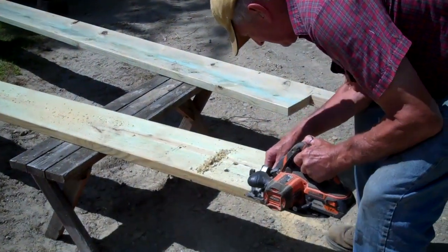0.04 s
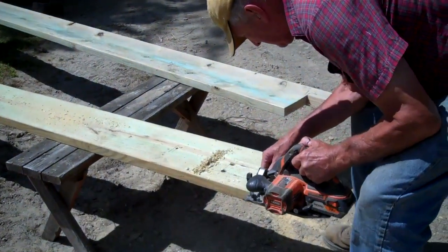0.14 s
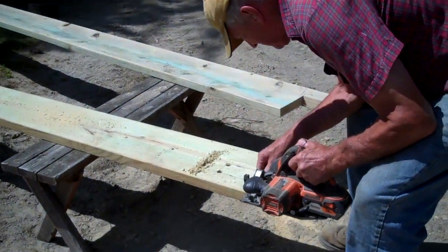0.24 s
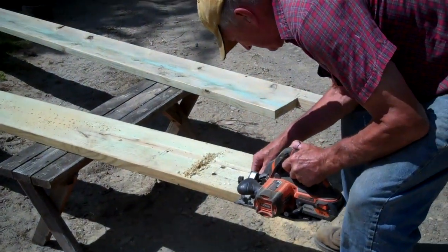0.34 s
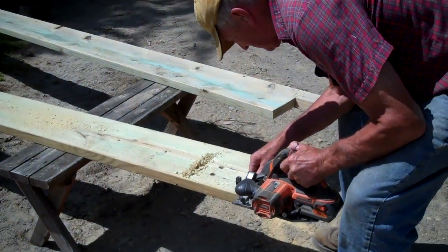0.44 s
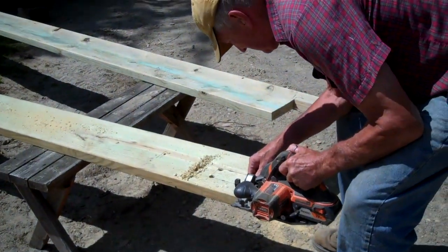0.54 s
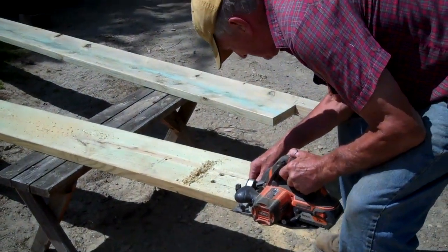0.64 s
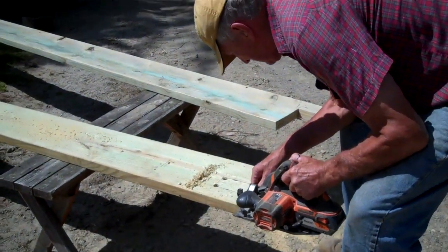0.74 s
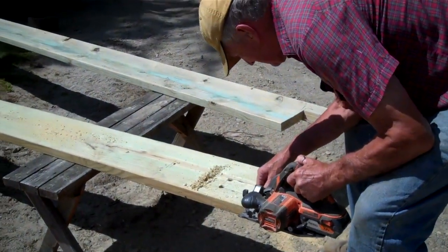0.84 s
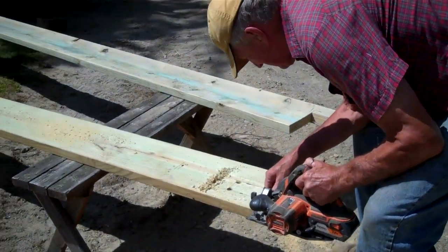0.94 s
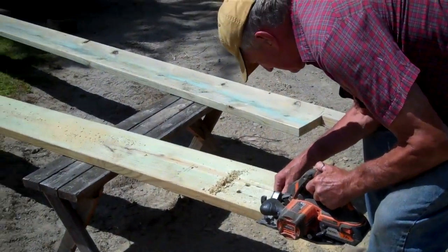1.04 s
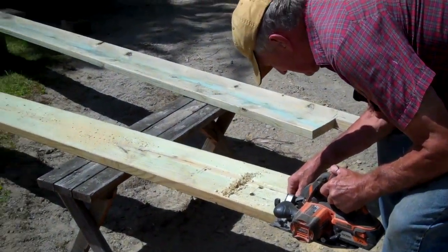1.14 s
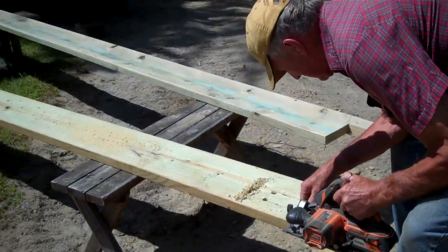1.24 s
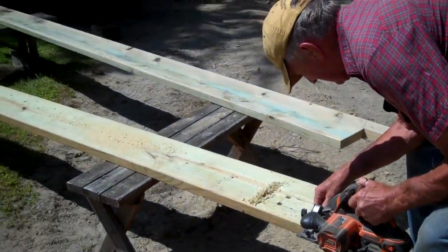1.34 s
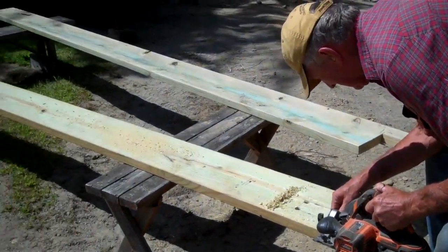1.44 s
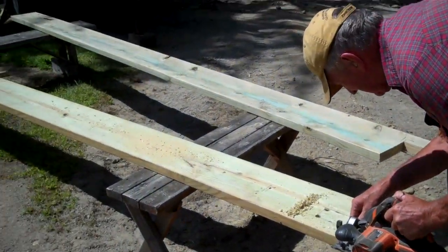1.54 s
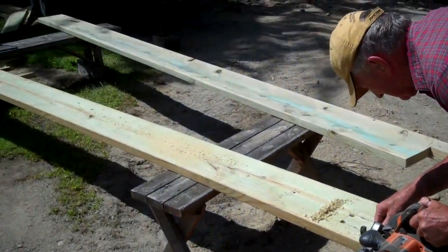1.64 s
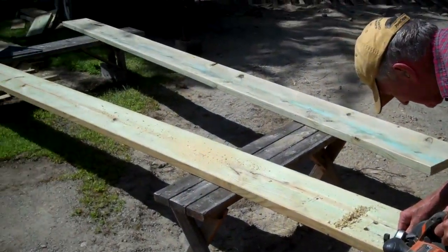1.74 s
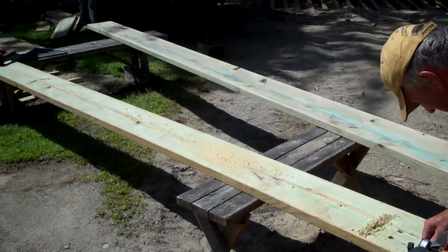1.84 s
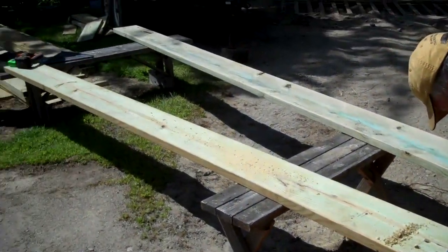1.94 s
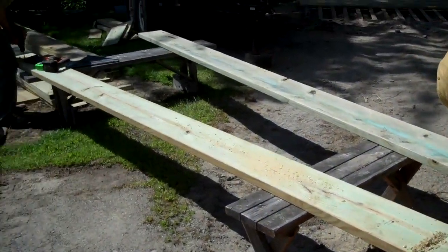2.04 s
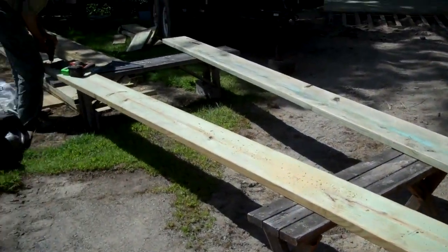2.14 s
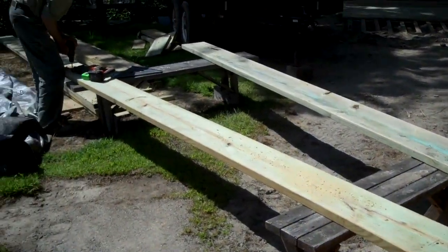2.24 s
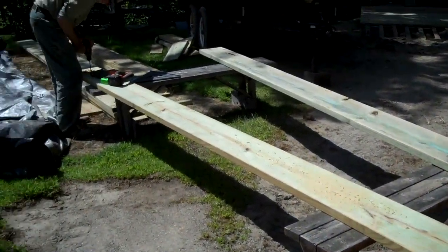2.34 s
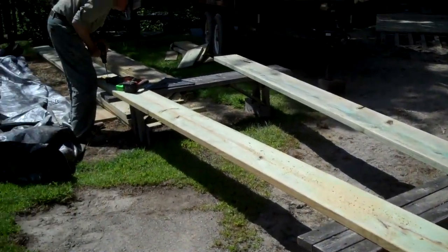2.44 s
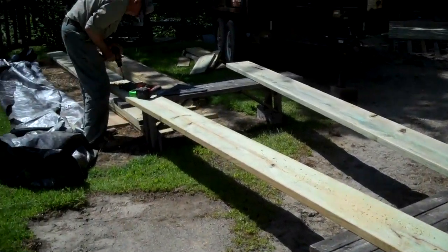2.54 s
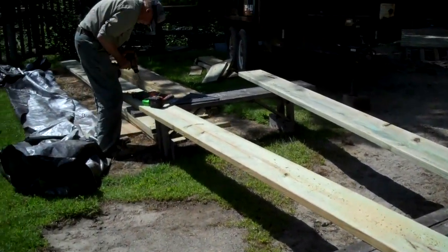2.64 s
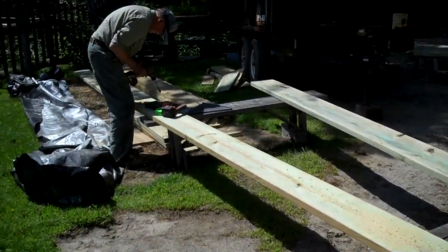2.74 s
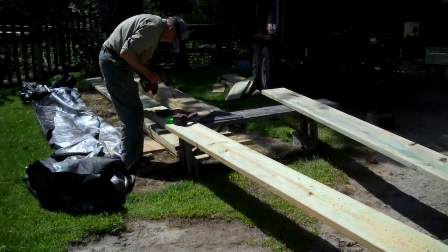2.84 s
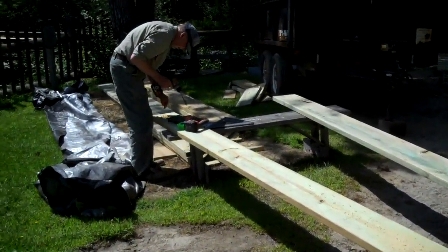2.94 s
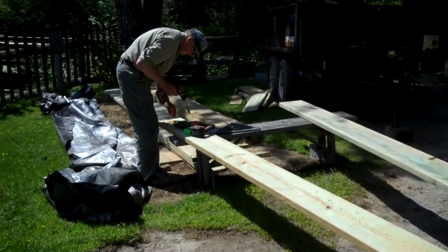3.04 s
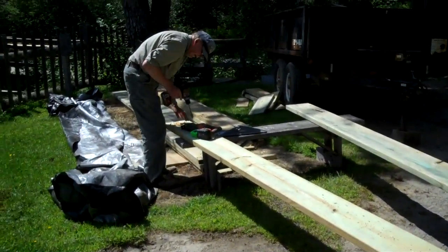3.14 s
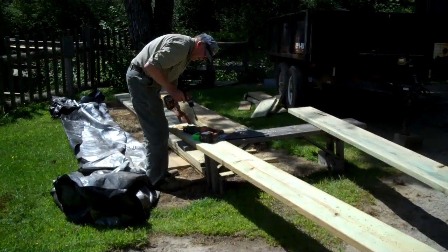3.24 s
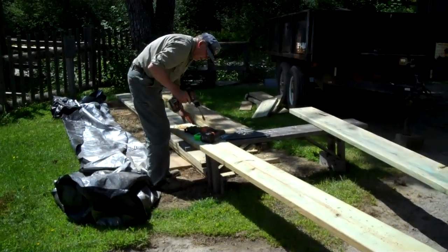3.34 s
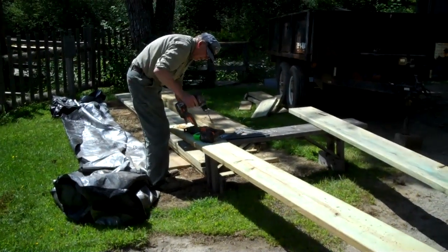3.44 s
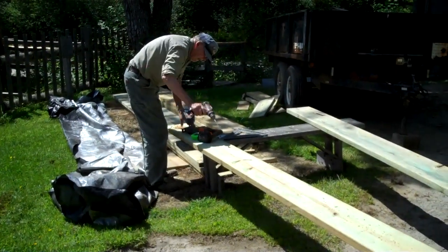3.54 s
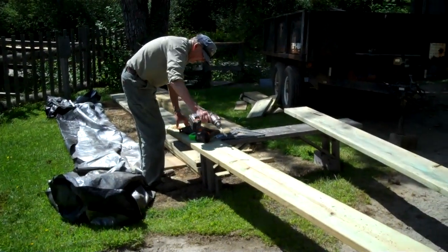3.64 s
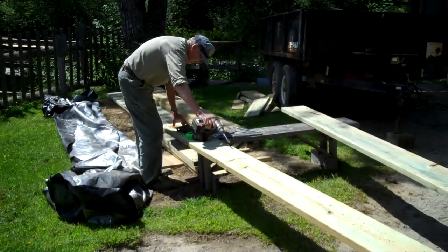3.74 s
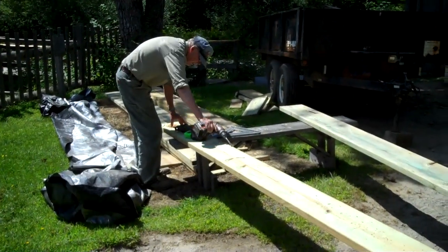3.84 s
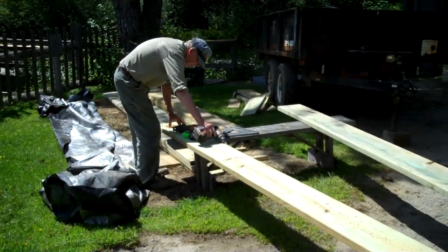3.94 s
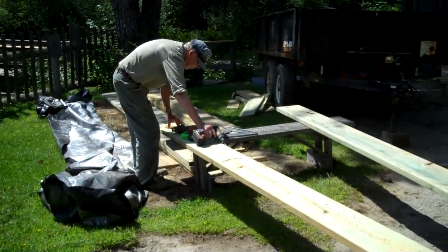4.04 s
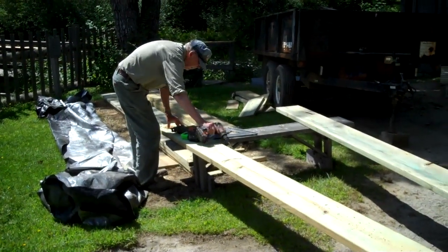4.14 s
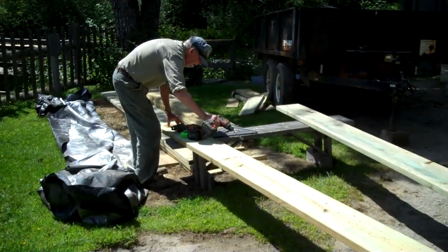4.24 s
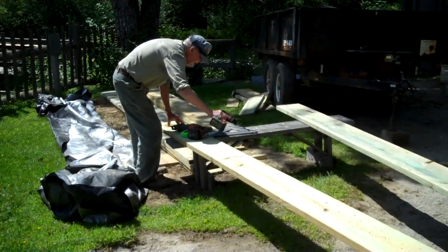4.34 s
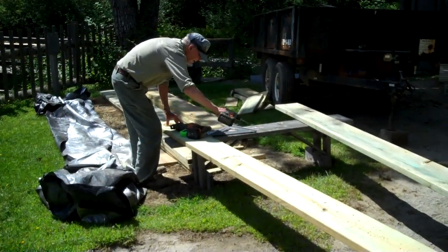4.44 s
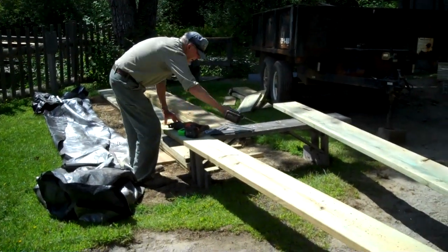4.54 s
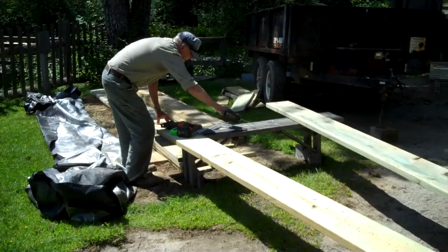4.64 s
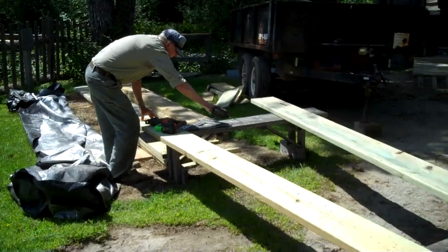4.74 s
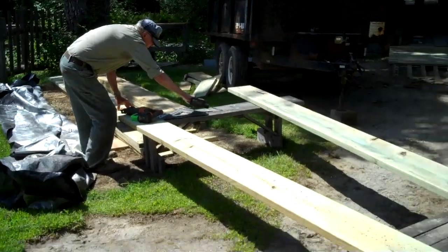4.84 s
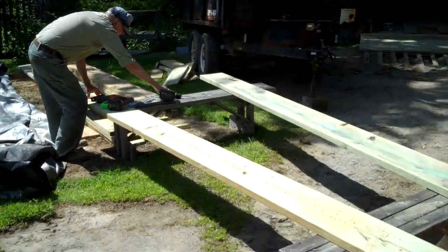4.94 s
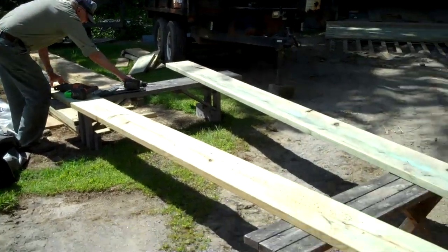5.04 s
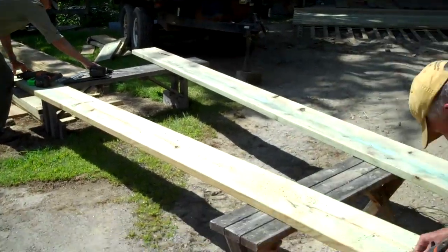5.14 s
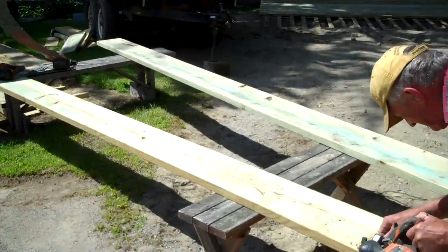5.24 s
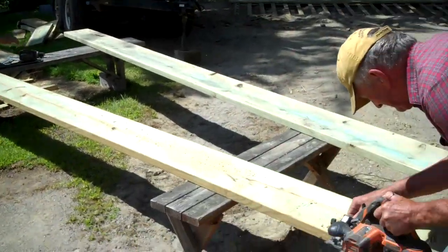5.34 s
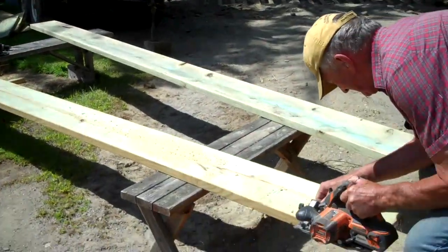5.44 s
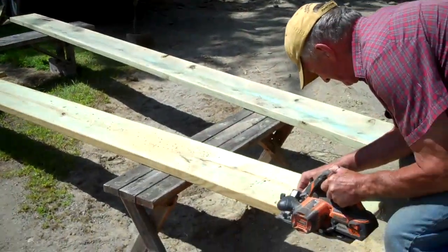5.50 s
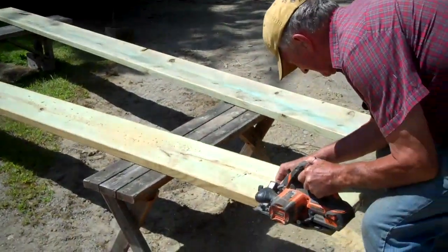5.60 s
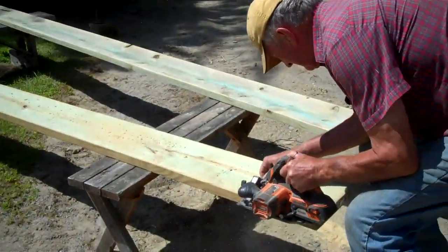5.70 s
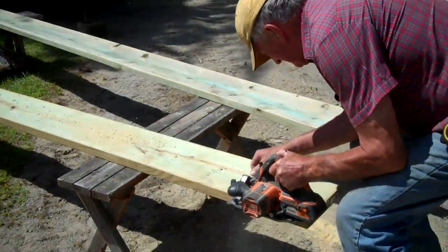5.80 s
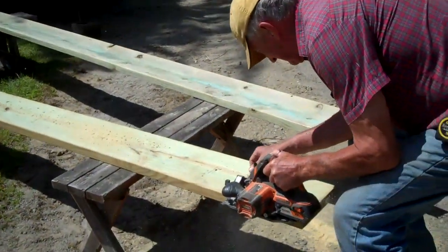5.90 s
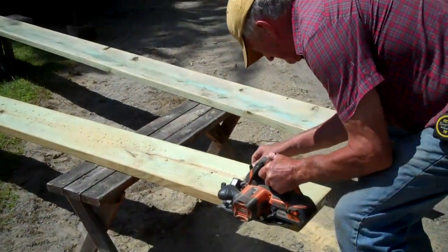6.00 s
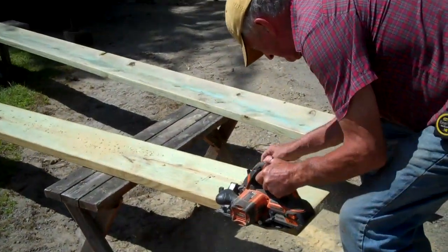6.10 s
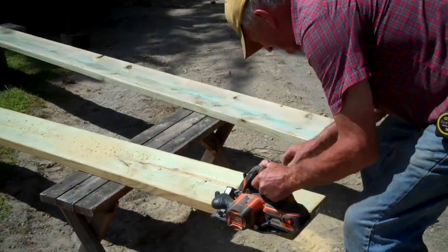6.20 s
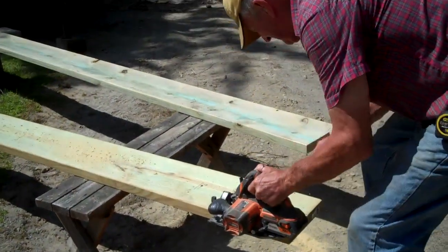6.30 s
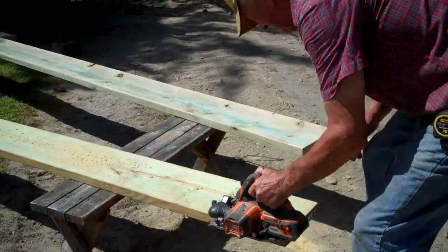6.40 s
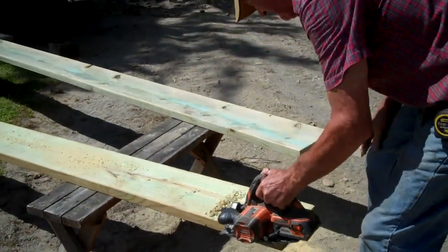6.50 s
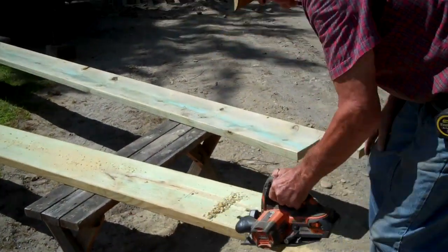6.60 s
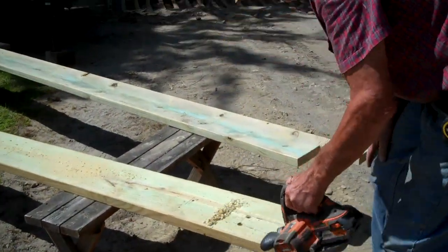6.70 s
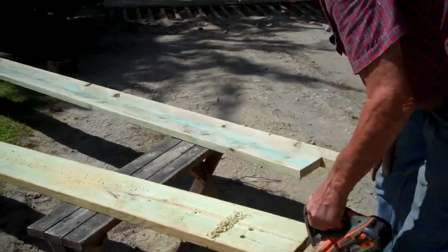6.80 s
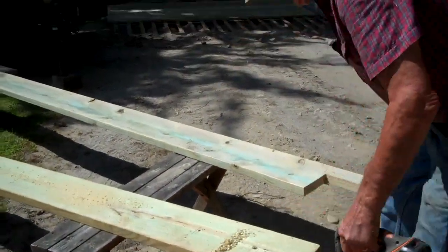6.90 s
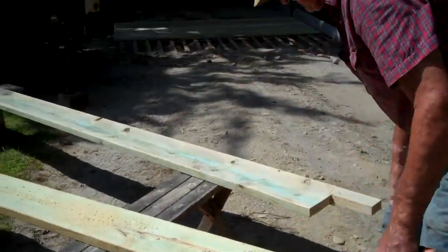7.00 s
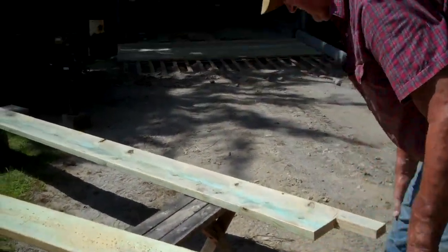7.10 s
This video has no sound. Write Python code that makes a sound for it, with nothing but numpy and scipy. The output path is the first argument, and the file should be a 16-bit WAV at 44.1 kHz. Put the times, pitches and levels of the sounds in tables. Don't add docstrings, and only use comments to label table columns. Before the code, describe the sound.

In an open yard, a second power tool whines and hisses farther off. At about one second a sharp switch click starts a planer very close by; it whirs up and cuts a plank with dense, bright hiss, flying chips and a low wooden hum. Its whine sinks under load, rises near the end, and the cutter brakes suddenly. Soft clatter follows as it is set down. A handheld stereo microphone swings, with the right side duller.

```python
import sys
import numpy as np
from scipy import signal
from scipy.io import wavfile
from scipy.ndimage import uniform_filter1d, map_coordinates

SR = 44100
rng = np.random.default_rng(int(sys.argv[2]) if len(sys.argv) > 2 else 0)


def master_out(mix):
    frames = np.transpose(np.atleast_2d(mix))
    ceiling = np.clip(frames, -1, 1)
    pcm = np.round(ceiling * 32767).astype(np.int16)
    wavfile.write(sys.argv[1], SR, pcm)


def attenuation_scalar(level_db):
    decades = np.asarray(level_db, float) / 20
    return 10 ** decades


N = 315756
TIME = np.arange(N) / SR
MESH, TURN = 0.552, 0.023
FREE_HZ = 2900
SWITCH_ON_S = 1.35


def rms_one(x):
    return x / np.sqrt(np.mean(x ** 2) + 1e-20)


def in_time(rows):
    s, *columns = np.transpose(rows)
    return [np.interp(TIME, s, c) for c in columns]


def at_hz(points, hz):
    points_hz, db = np.array(points).T
    return np.interp(np.log(hz), np.log(points_hz), db)


def between(start, stop, fade):
    return np.interp(TIME, [start - fade, start, stop, stop + fade], [0, 1, 1, 0])


def swells(rows):
    return sum(db * np.exp(-((TIME - s) / length) ** 2) for s, db, length in rows)


def drift(rate):
    r = np.exp(-80 * np.pi * rate / SR)
    white = rng.standard_normal(N // 40 + 2002)
    slow = signal.lfilter([1], [1, -2 * r, r * r], white)[2000:]
    slow = rms_one(slow - slow.mean())
    return np.interp(np.arange(N) / 40, np.arange(len(slow)), slow)


def resonance(x, hz, width):
    r = np.exp(-np.pi * width / SR)
    poles = [1, -2 * r * np.cos(2 * np.pi * hz / SR), r * r]
    return signal.lfilter([(1 - r * r) / 2, 0, (r * r - 1) / 2], poles, x)


def lifted(hz, modes):
    power = 1
    for f, width, db in modes:
        power = power + attenuation_scalar(db) ** 2 / (1 + (2 * (hz[::40] - f) / width) ** 2) ** 2
    return np.interp(np.arange(N), np.arange(N)[::40], 10 * np.log10(power))


def whine(hz, lines, wobble, waver_db):
    turn = 2 * np.pi * np.cumsum(hz) / SR
    out = np.zeros(N)
    for k, db in lines:
        level = np.sqrt(2) * attenuation_scalar(db + waver_db * drift(7.5))
        out += level * np.sin(k * turn + wobble * drift(160) + rng.uniform(0, 7.2))
    return out


# f/Hz, level/dB
SCATTERED = [(60, -14), (200, -10.5), (700, -23), (2200, -17.5), (5000, -6), (12000, -1.5)]


def hiss(colour, zones_hz, zones_db, shared_db, own_db, repeating=0):
    edges = 50 * 2 ** (np.arange(26) / 3)
    centres = np.sqrt(edges[1:] * edges[:-1])
    zone = np.searchsorted(zones_hz, centres)
    power = attenuation_scalar(at_hz(colour, centres)) ** 2 * np.diff(edges)
    white = rng.standard_normal((2, 3, N))
    white[:, 0] = rms_one(white[:, 0] + repeating)
    together = drift(3.2) + drift(45)
    out = np.zeros((3, N))
    for k, hz in enumerate(centres):
        band_filter = signal.butter(2, edges[k:k + 2], "band", fs=SR, output="sos")
        band = signal.sosfilt(band_filter, white[k % 2])
        zone_power = power[zone == max(zone[k], 1)].sum()
        share = np.sqrt(power[k] / zone_power * SR / 2 / (edges[k + 1] - edges[k]))
        gain = share * attenuation_scalar(zones_db[zone[k]] + shared_db * together + own_db * drift(7.4))
        out[0] += gain * band[0]
        out[1:] += gain * attenuation_scalar(at_hz(SCATTERED, hz)) * band[1:]
    return out


# t/s, f/Hz
NEAR_SPEED = [(1.7, 2837), (2.0, 2833), (2.3, 2958), (2.62, 3047), (3.05, 2830), (3.4, 2360), (3.55, 2216),
              (3.7, 2151), (3.9, 2241), (4.05, 2145), (4.35, 2184), (4.6, 2130), (5.0, 1916), (5.2, 1792),
              (5.58, 1751), (5.72, 1932), (5.9, 2056), (6.22, 2590)]


def speed():
    spin_up_s, settle_s = 0.118, 0.32
    since = np.clip(TIME - SWITCH_ON_S, 0, 1)
    return in_time(NEAR_SPEED)[0] * (1 - np.exp(-since / spin_up_s - (since / settle_s) ** 3))


# order, level/dB
COMMUTATOR_TONES = [(2, -56.5), (3, -58.5), (4, -59)]
# f/Hz, width/Hz, level/dB
HOUSING_MODES = [(3530, 450, 17), (3700, 200, 5), (4240, 300, 23), (4445, 77, 25.5), (4750, 180, 12),
                 (5170, 860, 31.5), (5550, 590, 23), (6380, 190, 7.5)]
# t/s, level/dB, length/s
LIGHT_LOAD = [
    (5.86, -11, .17),
    (1.37, -12, .03),
    (1.8, -8, .12),
]


def commutator():
    hz = speed()
    torque_db = 5 * between(1.43, 1.67, 0.03) + swells(LIGHT_LOAD)
    torque_db = torque_db + 10.5 * np.clip(FREE_HZ - hz, 0, 600) / 1000
    orders = []
    for k, db in COMMUTATOR_TONES:
        damped_db = np.clip((k * hz - 6450) / 40, 0, 14)
        orders.append((k, db + lifted(k * hz, HOUSING_MODES) + torque_db - damped_db))
    orders.append((2.86, -72 + torque_db + 28 * between(1.59, 1.5, 0.03)))
    throb = 1 + 0.3 * np.sin(2 * np.pi * np.cumsum(TURN * hz) / SR)
    unsteady = uniform_filter1d(np.abs(np.gradient(hz)) * SR / 2500, 2000)
    return throb * whine(hz, orders, wobble=0.25 + 0.65 * np.sqrt(np.abs(unsteady)), waver_db=2.0)


# multiple of the mesh rate, level/dB
MESH_TONES = [(1, -47.5), (2, -50), (3, -57.5), (1.5, -57), (4.5, -63.5)]
# multiple of the cutter turn, level/dB
SIDE_TONES = [(12, -17), (14, -15), (16, -16), (18, -20), (20, -15.5), (28, -12), (32, -14), (36, -8)]
# f/Hz, width/Hz, level/dB
GEARBOX_MODES = [(1059, 152, 15.7), (1217, 190, 13.5), (1450, 120, 12), (2520, 350, 14), (3440, 230, 25.6),
                 (4700, 120, 11), (7050, 160, 3.7)]


def gears():
    hz = speed()
    slack_db = 16 * between(0.74, 2.05, 0.11)
    mesh = []
    for k, db in MESH_TONES:
        mesh.append((k * MESH, db + lifted(k * MESH * hz, GEARBOX_MODES) + slack_db * (k not in (1, 2))))
    mesh_db = uniform_filter1d(mesh[0][1], 9000)
    sides = [(k * TURN, mesh_db + db + 0.5 * lifted(k * TURN * hz, GEARBOX_MODES)) for k, db in SIDE_TONES]
    return whine(hz, mesh, wobble=0.2, waver_db=2.0) + whine(hz, sides, wobble=0.3, waver_db=3.5)


# t/s, level/dB, length/s
PLANK_SWELLS = [
    (3.46, 9.5, 0.17),
    (4.0, 5, 0.16),
    (4.95, 3, 0.14),
]


def plank_hum():
    hz = speed()
    beats = whine(hz, [(k * TURN, 0) for k in range(3, 9)], wobble=0.1, waver_db=2.5)
    load_db = 2.5 * (FREE_HZ - hz) / 1000 * between(2.5, 4.99, 0.42)
    level_db = -51 + load_db + swells(PLANK_SWELLS)
    return attenuation_scalar(level_db) * resonance(beats, 259, 19.3) * between(1.62, 5.72, 0.24)


def near_motor():
    powered = between(1.4, 6.17, 0.03)
    return (commutator() + gears()) * powered + plank_hum()


# t/s, level/dB
PRESSURE = [(1.4, -22.5), (1.6, -18.5), (1.85, -20), (2.1, -19.5), (2.3, -21.5), (2.8, -19), (3.3, -19),
            (4.4, -19), (4.8, -18.5), (5.17, -17), (5.6, -20.5), (5.7, -20), (5.9, -20), (6.2, -23)]
# t/s, level/dB, length/s
BLADE_BITES = [
    (1.46, 2, 0.014),
    (1.74, 4.5, 0.04),
    (2.35, 3, 0.044),
    (2.61, 3.5, 0.083),
    (4.85, 1.5, .02),
    (5.77, 2.5, 0.057),
    (6.02, 5.5, 0.032),
    (6.17, 6, 0.038),
]


def cutting_db():
    brake_s, brake_db_per_s = 6.22, 112.5
    return in_time(PRESSURE)[0] + swells(BLADE_BITES) - brake_db_per_s * np.maximum(TIME - brake_s, 0)


def lost_khz():
    return np.minimum(FREE_HZ - speed(), 1200) / 1000


def running():
    return between(1.46, 7, 0.1) * between(0, 6.33, 0.04)


def each_turn():
    turns = np.cumsum(TURN * speed()) / SR + 0.0012 * drift(6)
    one_turn = rng.standard_normal(800)
    return rms_one(map_coordinates(one_turn, [turns % 1 * 800], order=3, mode="grid-wrap"))


# f/Hz, level/dB (per Hz)
CUTTING_COLOUR = [(88, -58), (150, -29), (256, -16), (375, -29), (592, -5), (744, -7), (972, -6),
                  (1200, -7.5), (1510, -6), (2770, 0.5), (3840, -1.5), (4300, -1.5), (5110, -5.5),
                  (6300, 1), (14300, -17)]


def cutting(near_lag):
    air_db, lost = cutting_db(), lost_khz()
    plank_db = air_db - 7.5 - 8 * lost
    housing_db = air_db - 1.5 - 2.5 * lost
    top_db = air_db - 13 + near_lag + 3.5 * between(3.23, 4.95, 0.2)
    under_db = np.minimum(uniform_filter1d(air_db, 20000), air_db + 4) - 13.0
    zones = [under_db, plank_db, housing_db, air_db, top_db]
    cut = hiss(CUTTING_COLOUR, [400, 1500, 4000, 8500], zones, shared_db=0.9, own_db=1.1,
               repeating=1.45 * each_turn())
    cut = running() * cut
    hollow = 0.1 + 0.5 * between(3.4, 4.8, 0.2)
    return cut - hollow * resonance(cut, 3410, 400)


# f/Hz, width/Hz, level/dB
CHIP_RINGS = [(6200, 220, 7), (2590, 450, -7), (7300, 2300, -17.5), (4700, 130, -72)]


def chips(near_lag):
    level_db = cutting_db() - 2 + 3 * lost_khz() - near_lag
    struck = rng.random(N) < 2500 * attenuation_scalar(4.5 * drift(50)) / SR
    force = attenuation_scalar(1.4 * np.minimum(rng.exponential(1, N), 4))
    clicks = struck * force * rng.choice([-1, 1], N) + 1e-18
    ringing = sum(attenuation_scalar(db) * resonance(clicks, hz, width) for hz, width, db in CHIP_RINGS)
    return running() * attenuation_scalar(level_db) * rms_one(ringing)


# t/s, peak level/dB, ring f/Hz, second ring f/Hz, length/s
KNOCK_EVENTS = [(1.3525, 5, 2290, 5440, 0.0066), (1.62, -7, 7500, 7050, 0.01),
                (2.657, -5, 6550, 3000, 0.01), (6.023, -15, 6200, 2800, 0.0034),
                (6.187, -9.5, 5914, 2476, 0.017), (6.276, -18.5, 2224, 1190, 0.016),
                (6.66, -21, 6300, 6000, 0.024), (6.7, -15.5, 6200, 6100, 0.034),
                (6.714, -21.5, 2560, 2300, 0.014), (6.73, -15, 2400, 3620, 0.0066),
                (6.745, -19, 2760, 5800, 0.022), (6.772, -18.5, 875, 1150, 0.038)]


def knocks():
    out, t = np.zeros(N + 3000), np.arange(3000) / SR
    for s, db, hz, second_hz, length in KNOCK_EVENTS:
        burst = rng.standard_normal(3000) * np.minimum(t / 0.0002, 1) * np.exp(-(t / length) ** 1.8)
        rings = resonance(burst, hz, 290) + 0.37 * resonance(burst, second_hz, 910)
        body = rings + attenuation_scalar(db / 2) * (0.019 * burst + 0.0022 * np.abs(burst))
        start = round(s * SR)
        out[start:start + 3000] += attenuation_scalar(db) * body / np.abs(body).max()
    return out[:N]


# t/s, f/Hz
FAR_MOTOR_SPEED = [(0.05, 1797), (.5, 2016), (.6, 1999), (.7, 1917), (.88, 1928), (.98, 1843), (1.12, 2119),
                   (1.29, 2072), (1.65, 1877), (1.8, 1919), (2.12, 1879), (2.4, 2048), (2.62, 2100),
                   (2.85, 2016), (3.0, 1980), (3.1, 1930), (3.27, 1840)]
# order, level/dB
FAR_TONES = [(1, -55), (2, -54), (3, -60), (4, -59), (5, -80)]
# f/Hz, width/Hz, level/dB
FAR_MODES = [(4000, 350, 16), (4150, 140, 21), (5800, 640, 27), (4750, 150, 15), (7400, 95, 22),
             (7570, 370, 19), (8050, 600, 11), (9600, 530, -1)]
# t/s, level/dB, length/s
FAR_HELD_BACK = [
    (1.02, -14, .06),
    (1.48, -10, .12),
]


def far_motor():
    hz, = in_time(FAR_MOTOR_SPEED)
    fan_db = 10 * between(1.622, 4, 0.03)
    orders = [(k, db + lifted(k * hz, FAR_MODES) + fan_db * (k == 4)) for k, db in FAR_TONES]
    level_db = swells(FAR_HELD_BACK) + 5 * between(1.622, 4, 0.034)
    return whine(hz, orders, wobble=0.45, waver_db=1.5) * attenuation_scalar(level_db) * between(-1, 3.22, 0.051)


def far_bite():
    lumps = attenuation_scalar(2.5 * drift(25)) * between(0.885, 2.9, 0.06)
    return attenuation_scalar(-16) * lumps * resonance(rng.standard_normal(N), 1080, 170)


# f/Hz, level/dB (per Hz)
YARD_SPECTRUM = [(35, -62), (60, -32), (97, -38), (198, -19), (413, -23), (453, -7.5), (803, 0),
                 (1060, -2.5), (1300, -5), (1970, -10), (3490, -8.5), (3920, -10), (5160, -7), (6640, 0.5),
                 (14500, -14)]
# t/s, level/dB, length/s
LEAF_GUSTS = [
    (.75, 4.5, 0.49),
]
# t/s, level/dB, length/s
INSECTS = [
    (.32, -0.5, .08),
    (.66, 2, 0.044),
]
# t/s, level/dB, length/s
DRAG = [
    (6.7, 4, 0.11),
]


def yard():
    quiet_s, under_cut_db = 6.38, -39.5
    level_db, rumble_db, top_db = in_time([
        (0, -26, -14.5, -12), (SWITCH_ON_S, -26, -14.5, -12),
        (1.6, under_cut_db, -8, -14), (3.2, under_cut_db, -8, -14),
        (6.1, under_cut_db - 9, 0, -26), (quiet_s, -37, -9, -16.5)])
    recover_db = -5.5 * np.exp(-np.abs(TIME - quiet_s) / 0.12)
    level_db = level_db + recover_db + swells(DRAG) + swells(INSECTS)
    rumble_db = rumble_db + 4 * between(6.3, 6.45, 0.07)
    rumble_db = rumble_db + 5 * between(1.0, 1.67, 0.085)
    lowest_db = level_db - 5.0 + 5 * between(5.5, 8, 0.1)
    zones = [lowest_db, level_db + rumble_db, level_db, level_db + top_db + swells(LEAF_GUSTS)]
    around = hiss(YARD_SPECTRUM, [400, 1500, 8500], zones, shared_db=0.17, own_db=2.13)
    around = around + 0.5 * between(-1, 0.54, 0.2) * resonance(around, 1050, 150)
    return around + 0.12 * resonance(around, 6400, 650)


def mains_hum():
    return np.sqrt(2) * attenuation_scalar(-72 + 2.1 * drift(4)) * np.sin(2 * np.pi * 61 * TIME)


def port_wind():
    low = signal.butter(1, [30, 140], "band", fs=SR, output="sos")
    wind = signal.sosfilt(low, rng.standard_normal((3, N)))
    return attenuation_scalar(-62) * rms_one(wind[0] + 0.66 * wind[1:]) * attenuation_scalar([[1.2], [-1.2]])


def placed(x, lag):
    return np.array([map_coordinates(x, [np.arange(N) - lag], order=3, mode="nearest"), x])


# t/s, near tool lag/samples, surroundings lag/samples
MICROPHONE_SWING = [(0, 1.3, -0.1), (1.3, 4, 0.0013), (2.2, 4.74, 0.31), (2.8, 5.47, -1.1),
                    (4.7, 5.36, 1.5), (5.3, 4.84, 1.5), (5.8, 2.35, 1.4), (7.16, 3.56, -0.65)]


def scene():
    near_lag, far_lag = in_time(MICROPHONE_SWING)
    cut = cutting(near_lag)
    near = cut[0] + near_motor() + chips(near_lag) + knocks()
    pan = attenuation_scalar(np.outer([1, -1], -0.8 + 0.13 * near_lag))
    near = pan * (placed(near, near_lag) + cut[1:])
    around = yard()
    far = attenuation_scalar([[0.4], [-0.4]]) * placed(around[0] + far_bite() + far_motor(), far_lag)
    return near + far + around[1:] + mains_hum() + port_wind()


def roll_off(x):
    return signal.sosfilt(signal.butter(12, 14730, fs=SR, output="sos"), x)


def record(dry):
    dry = dry + 0.5 * resonance(dry, 7160, 1600)
    muffle = signal.butter(4, 6730, fs=SR, output="sos")
    right = signal.sosfilt(muffle, dry[1])
    right = right + 0.38 * resonance(right, 6300, 1700) + attenuation_scalar(-29.5) * dry[1]
    overloaded = np.clip([dry[0], right], -0.99, 0.99)
    top_cut = signal.ellip(10, 1 / 2, 60, 14250, fs=SR, output="sos")
    mix = signal.sosfilt(top_cut, overloaded)
    return roll_off(mix)


dry = scene()
out = record(dry)
master_out(out)
```